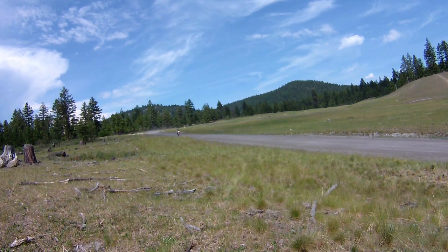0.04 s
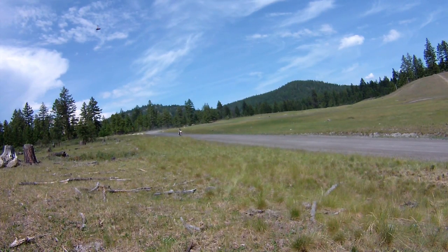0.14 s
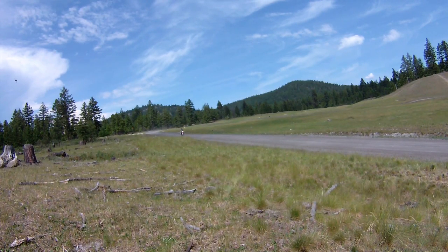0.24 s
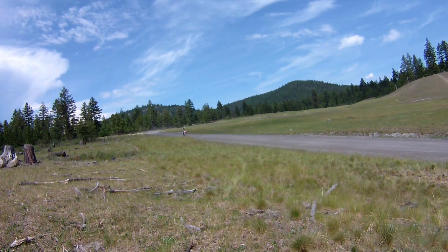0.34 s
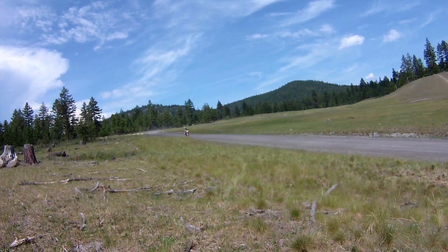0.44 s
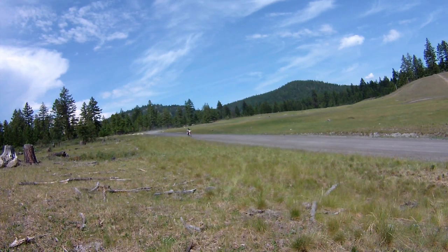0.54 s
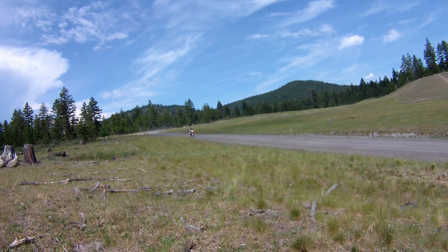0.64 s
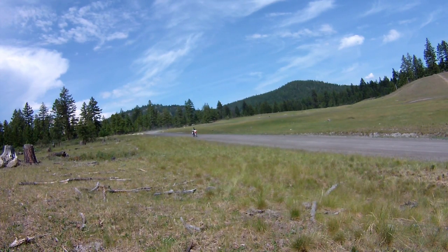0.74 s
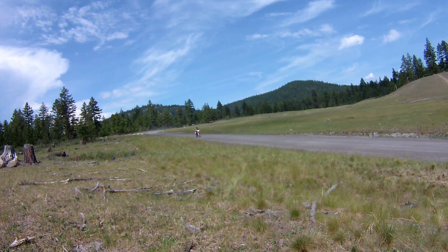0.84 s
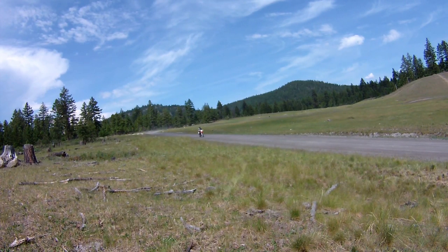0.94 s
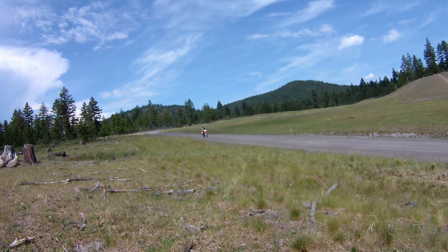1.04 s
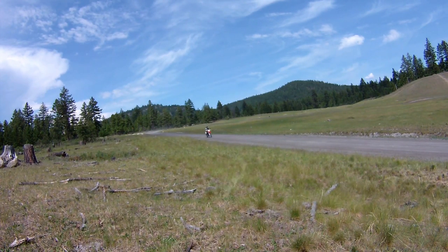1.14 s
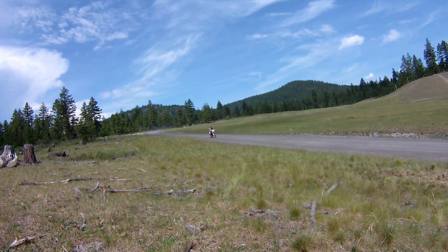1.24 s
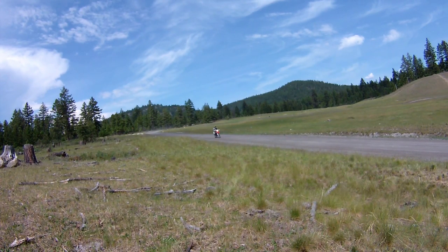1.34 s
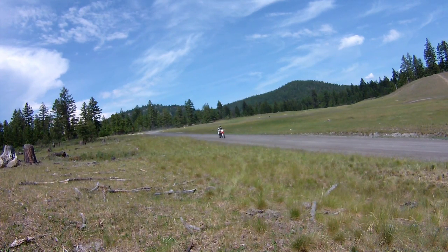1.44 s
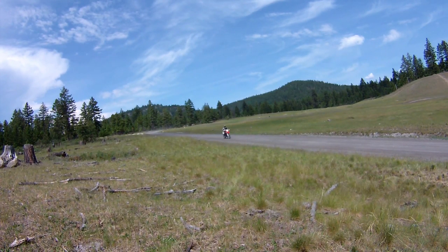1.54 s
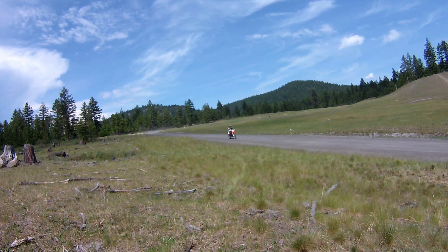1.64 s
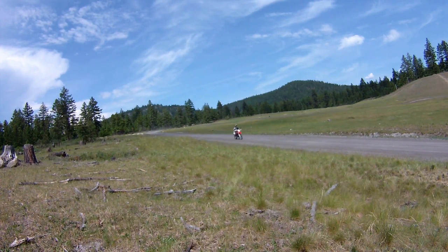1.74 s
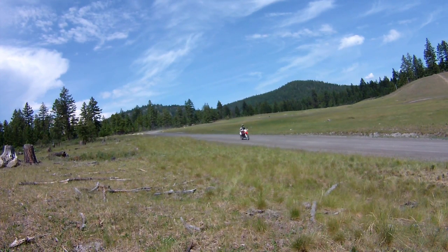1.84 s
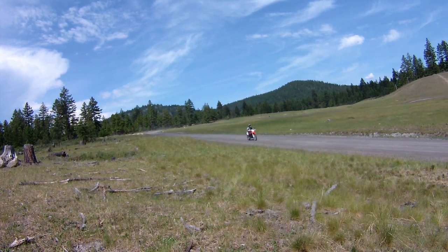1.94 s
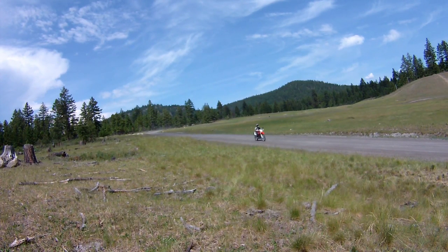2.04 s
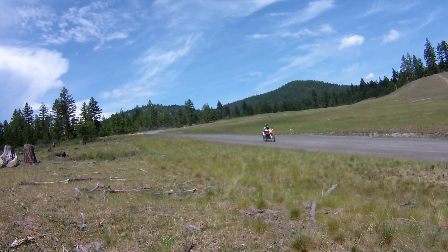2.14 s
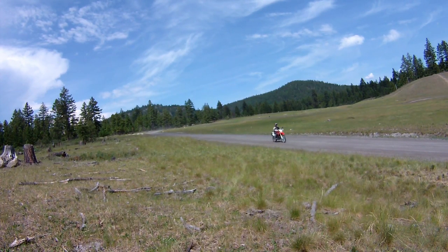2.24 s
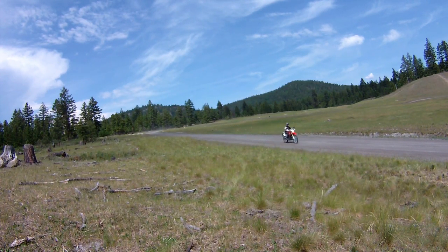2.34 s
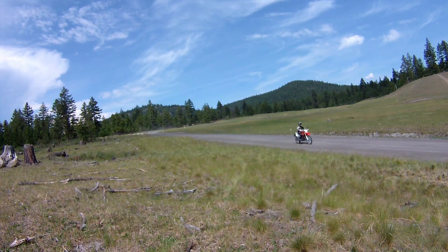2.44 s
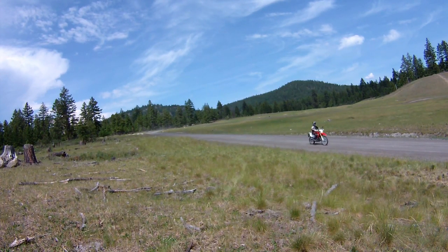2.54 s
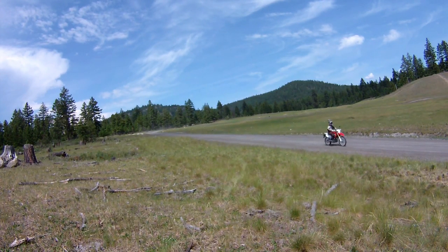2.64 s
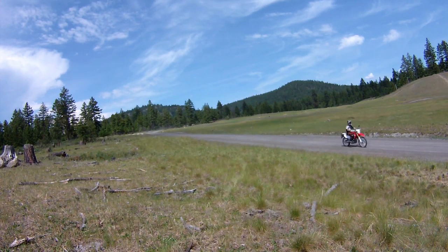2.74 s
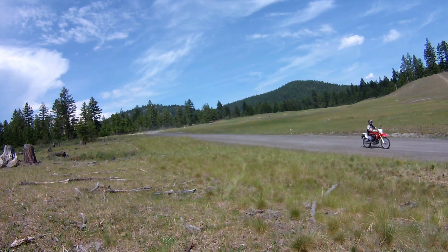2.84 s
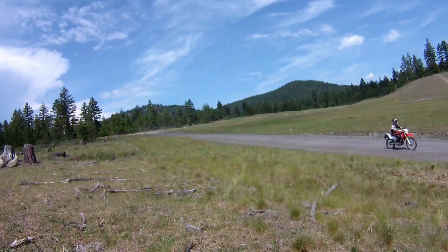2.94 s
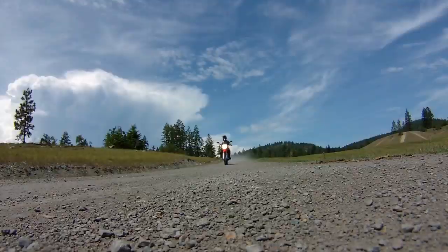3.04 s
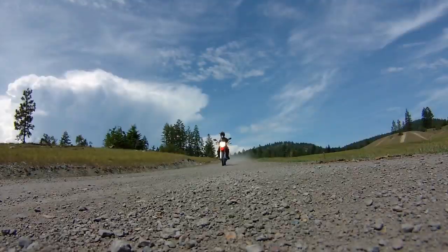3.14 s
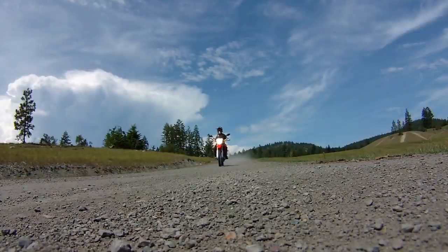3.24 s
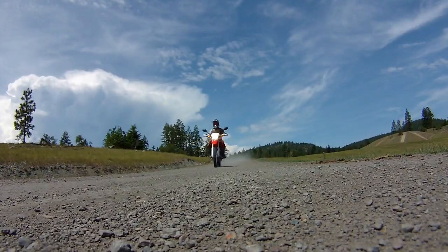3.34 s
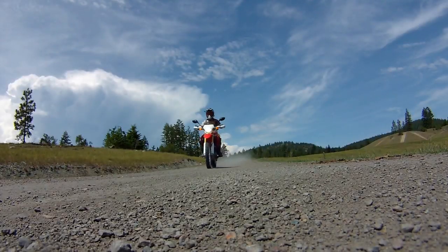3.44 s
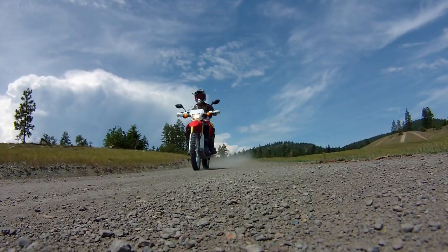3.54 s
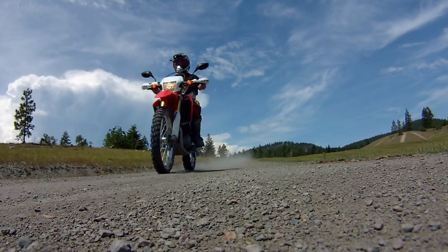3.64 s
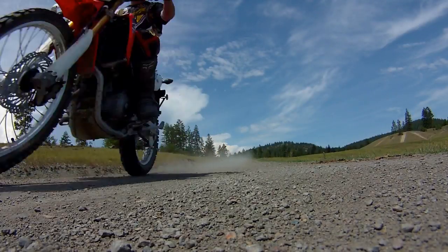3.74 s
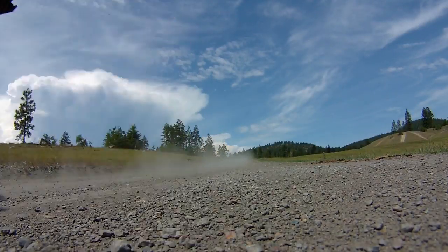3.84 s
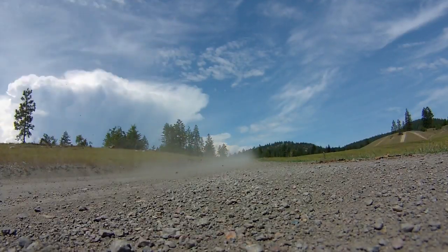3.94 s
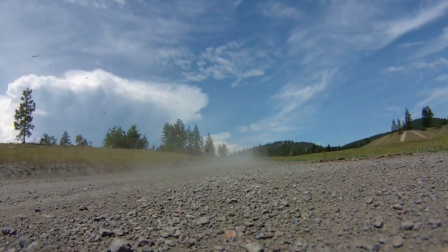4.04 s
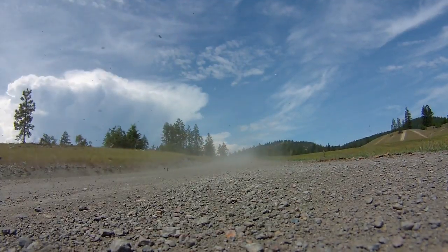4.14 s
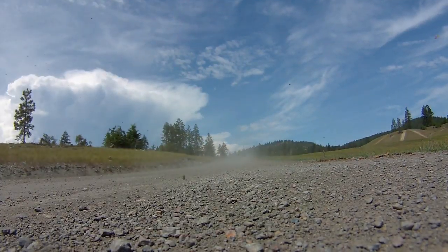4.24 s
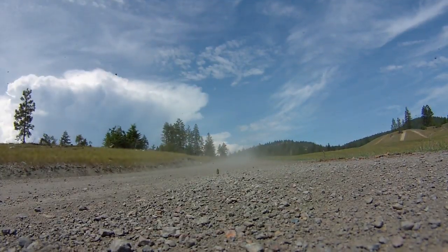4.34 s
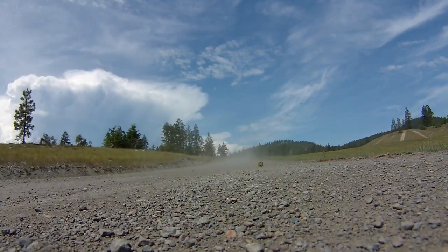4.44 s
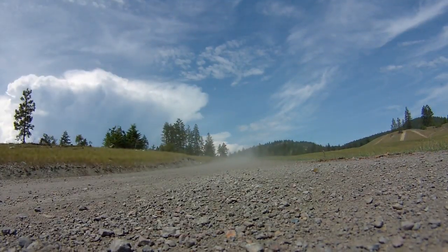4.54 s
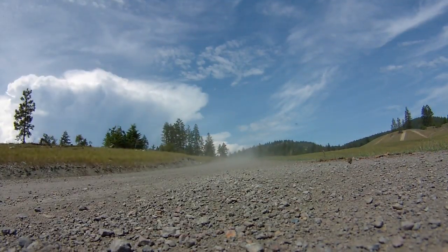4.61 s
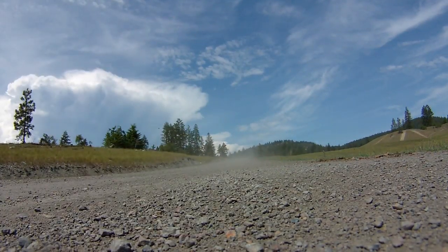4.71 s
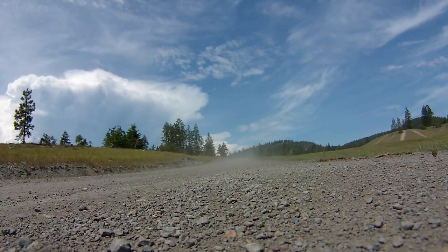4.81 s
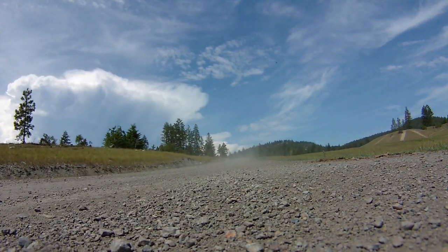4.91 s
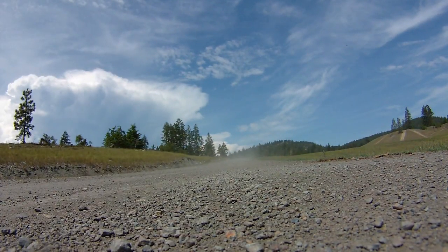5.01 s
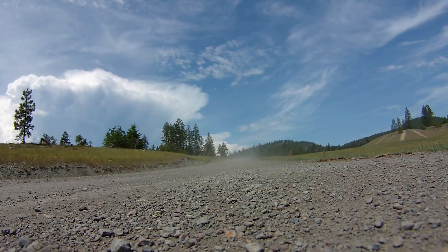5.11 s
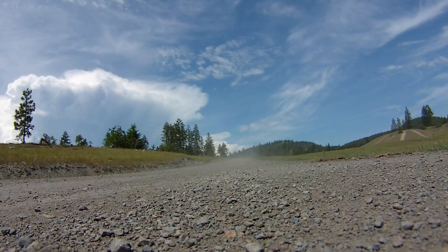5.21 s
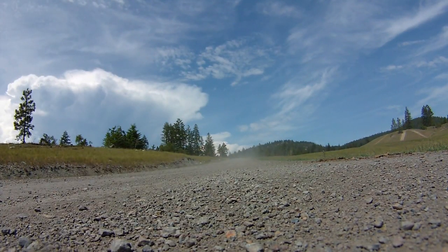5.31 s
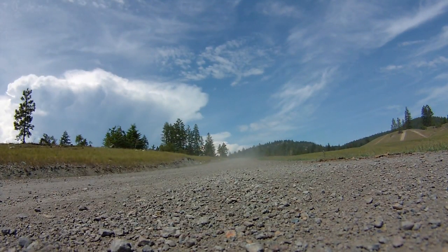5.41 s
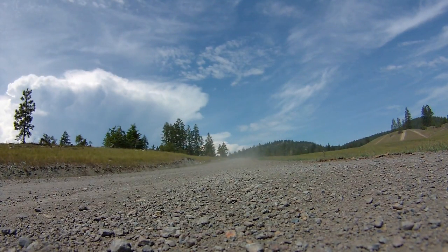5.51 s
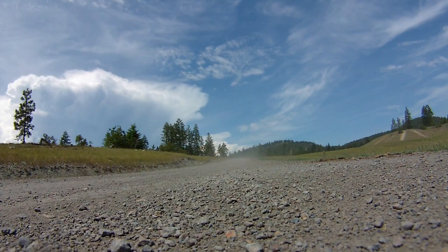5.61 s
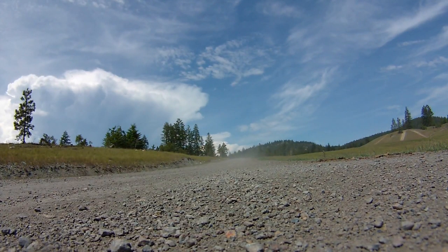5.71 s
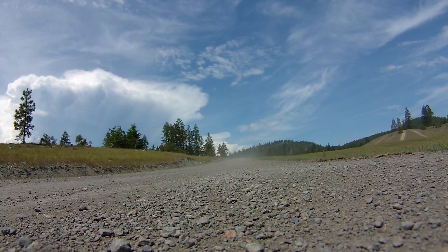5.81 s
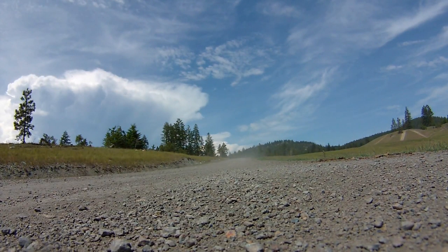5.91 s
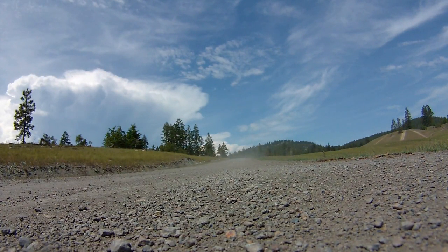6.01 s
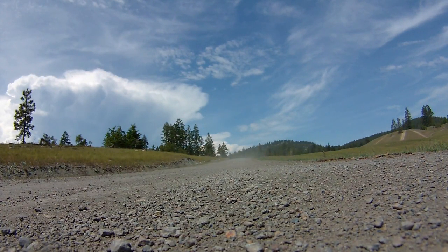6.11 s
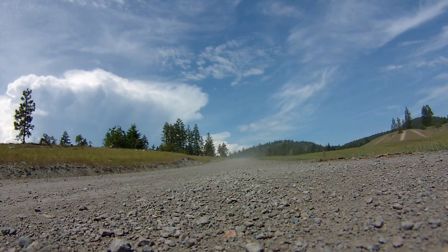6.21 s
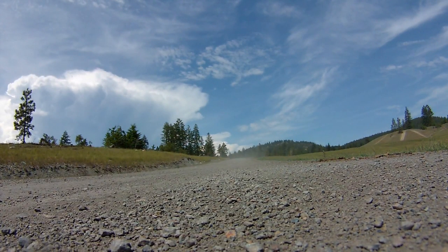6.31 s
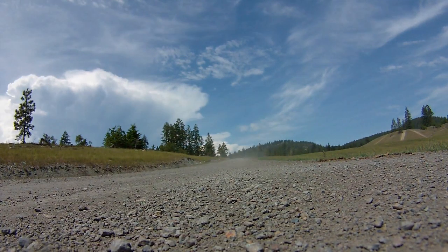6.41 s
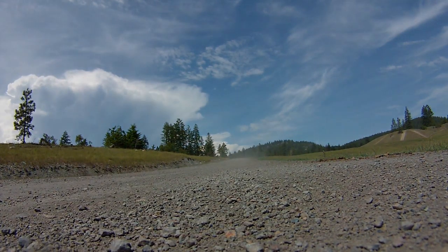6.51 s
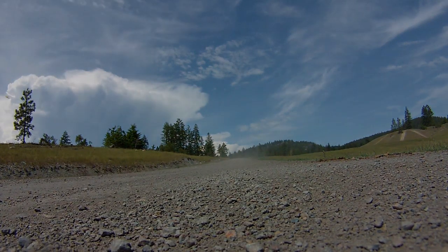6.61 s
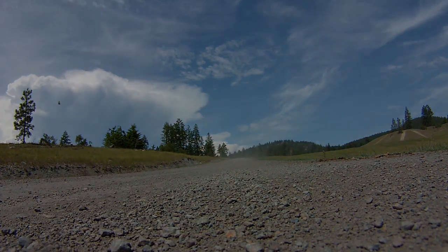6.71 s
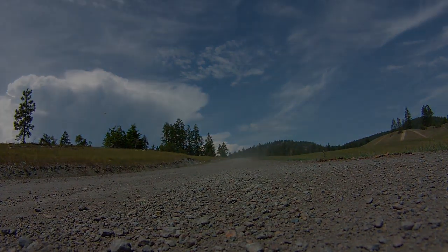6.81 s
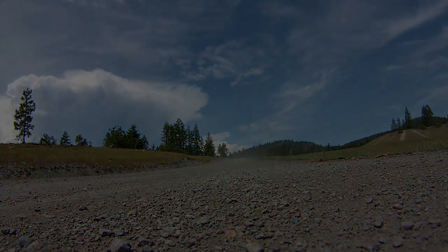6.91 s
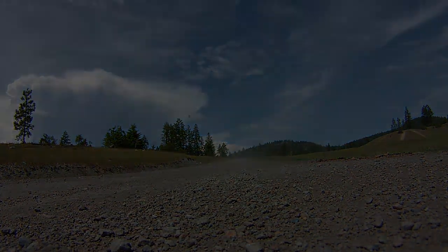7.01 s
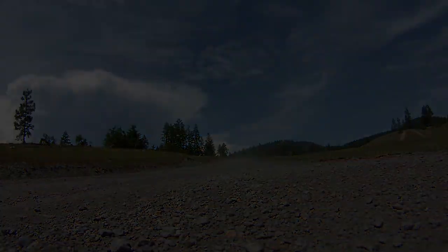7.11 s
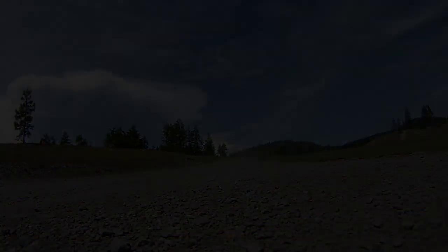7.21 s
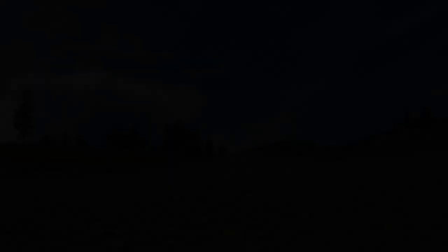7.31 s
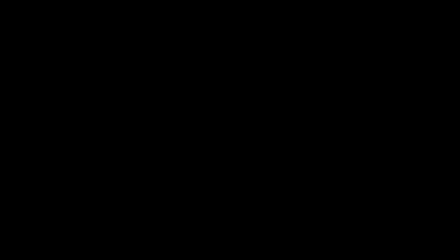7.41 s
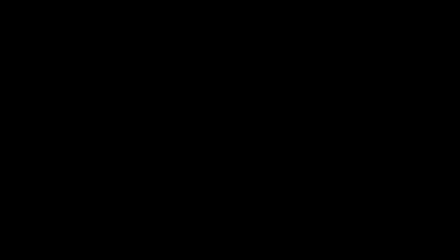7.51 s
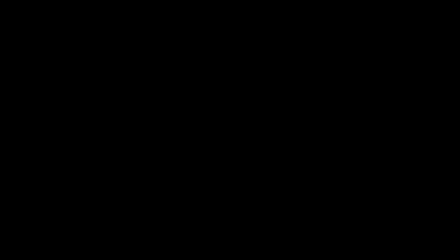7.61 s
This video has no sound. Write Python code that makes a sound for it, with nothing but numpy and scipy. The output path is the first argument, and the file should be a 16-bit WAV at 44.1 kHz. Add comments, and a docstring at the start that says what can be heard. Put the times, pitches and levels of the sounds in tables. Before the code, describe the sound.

A single-cylinder dirt bike approaches over gravel, roars past very close, drops in pitch, then blips its throttle as it rides away and fades.

```python
"""On a gravel road, a single-cylinder dirt bike comes down to a small camera on the ground, passes close by
and rides off, shutting and blipping the throttle. Exhaust orders, a ringing engine casing and tyre noise
make the bike, with two hums behind it. Its wake buffets the microphone and flung grit ticks on the housing.
The recorder holds each of its 12000 samples a second as a step, which mirrors the sound into the treble."""
import sys
import numpy as np
from scipy import signal
from scipy.fft import rfft, irfft
from scipy.io import wavfile
from scipy.ndimage import uniform_filter1d

SR = 44100
rng = np.random.default_rng(int(sys.argv[2]) if len(sys.argv) > 2 else 0)


def materialize(psi):
    """Save the field psi as 16-bit PCM at rate SR to the path in sys.argv[1].

    A 1-D psi becomes a single channel; in a 2-D psi each row is a channel.
    """
    bounded = np.clip(np.atleast_2d(psi).T, -1, 1)
    quanta = np.round(bounded * 32767).astype(np.int16)
    wavfile.write(sys.argv[1], SR, quanta)


N = 337806
T = np.arange(N) / SR  # time in seconds

# Engine winding up, then the throttle shuts, blips, shuts and opens.
# Each row: time in seconds, firing rate at the engine in Hz.
FIRING_RATE = [(0, 50.97), (.6, 52.07), (1.2, 52.88), (1.65, 53.7), (2.2, 54.17), (2.7, 54.47),
               (3.05, 55.02), (3.9, 55.62), (4.5, 55.62), (4.78, 54.5), (4.9, 52.05), (5.12, 43.4),
               (5.43, 33.5), (5.5, 33.1), (5.9, 50.1), (6.5, 28.8), (6.72, 23), (6.86, 21.2), (7.1, 24.6),
               (7.35, 31.3)]
# Roar of casing and gravel. Each row: time in seconds, level before the loss with distance in dB.
ROAR_LEVEL = [(0, -15), (1.06, -16.5), (1.3, -19), (1.91, -20), (3.05, -13), (3.7, -10), (4.12, -10.5),
              (4.15, -19), (4.34, -12.5), (4.63, -10.5), (4.67, -16.5), (4.79, -9), (5.7, -14), (5.83, -11),
              (5.97, -16), (6.59, -19.5), (7.2, -20.5), (7.38, -15)]
# Side of the bike that faces the microphone. Each row: metres past the microphone, aspect number
# (0 far ahead, 1 nearer, 2 close ahead, 3 just past, 4 riding off, 5 far behind).
ASPECT_BY_PLACE = [(-74, 0), (-35, 1), (-26, 1.15), (-13, 2), (-.1, 2), (1.5, 3), (13, 3.1), (27, 4),
                   (60, 4), (74, 5)]
# Exhaust pipe. Each row is an aspect: relative level in dB of multiples 1 to 8 of the firing rate.
PIPE_ORDERS = [
    [0, -7, -15, -8, -21, -21, -22, -22],
    [-7, 0, -11, -9, -16, -21, -19, -21],
    [0, 0, -11, -9, -14, -19, -17, -19],
    [-11, 0, -8, -12, -20, -13, -13, -2],
    [-13, -6, -1, -3, -14, -20, -22, -22],
    [-14, -11, -6, -2, -1, -2, -4, -6],
]
# Colour of the gravel noise, one list per aspect 0 to 4. Each row: frequency in Hz, relative density in dB per Hz.
GRAVEL_COLOURS = [
    [(20, -36), (60, -3), (250, -9), (550, -11.5), (800, -17.5), (1080, -18.5), (1860, -24.5), (2730, -26),
     (3600, -36), (5200, -38)],
    [(20, -14), (60, -6.5), (250, -6.5), (550, -10.5), (800, -13), (1200, -13), (1860, -22), (2730, -23),
     (3600, -31.5), (5200, -38)],
    [(20, -20.5), (60, -20), (250, -6.5), (445, -10), (1000, -13.5), (1600, -17.5), (2600, -19),
     (3300, -20), (5200, -25)],
    [(20, -5), (80, -5.5), (270, -8), (420, -5.5), (770, -16.5), (1500, -19), (2260, -20.5), (2480, -21),
     (3150, -28), (5200, -30)],
    [(20, -9), (64, -5), (140, -12), (250, -8.5), (386, -7.5), (480, -5.5), (560, -10.5), (735, -16.5),
     (2200, -20), (3500, -30.5), (5200, -35.5)],
]
# Two hums behind the bike, perhaps the tyre knobs, one list each.
# Each row: time in seconds, pitch in Hz, level before the loss with distance in dB.
HUM_TRACKS = [
    [(4.2, 483, -22), (4.32, 474, -7), (4.53, 472, -10), (4.62, 472, -13.5), (5.1, 452.5, -13),
     (5.55, 480.3, -18.5), (5.78, 485, -9.5), (6, 500, -20.5), (7.05, 483.7, -20), (7.2, 484, -34)],
    [(6.2, 429, -41), (6.5, 404, -20), (6.9, 390.4, -35), (7.2, 372, -16.5)],
]
# Swells of wind rumble. Each row: start in seconds, hold in seconds, level in dB.
WAKE_SWELLS = [(4.1, 0.0092, -23), (4.25, .2, -39.5), (4.524, 0.17, -21), (4.794, 0.096, -28)]
# Gusts that thump the microphone. Each row: start in seconds, relative level in dB, pitch in Hz, +1 push or -1 pull.
GUST_THUMPS = [(4.512, -14.5, 45.8, -1), (4.531, -28.5, 44.6, 1), (4.544, -12.5, 55, -1),
               (4.584, -2.5, 94, 1), (4.593, -5, 96.9, -1), (4.637, -1, 107, 1), (4.654, -16, 70.5, -1),
               (4.677, -7, 85, 1), (4.762, -11, 60, -1), (4.787, -5, 103, 1), (4.977, -18, 45.6, -1),
               (5.406, -22, 110, -1)]
# Grains on the housing. Each row: start in seconds, relative level in dB, pitch in Hz.
GRIT_TICKS = [(4.435, -19.5, 5340), (4.443, -23.5, 4730), (4.699, -41, 4760), (4.9796, -27.5, 5460)]
# Brief dip of the level: half width (to 1/e of the depth) in seconds, depth in dB.
DIP_SHAPE = (.008, -11)
# Filter ahead of the sampler. Each row: frequency in Hz, gain in dB.
SAMPLER_FILTER = [(5000, -1), (5400, -5.5), (5700, -12), (6000, -17.5)]
# Ring of the engine casing, one list from ahead and one from behind.
# Each row: frequency in Hz, width in Hz, relative level in dB.
CASING_MODES = [
    [(705, 160, -11), (903, 49, 0), (1065, 168, 2), (1090, 86, -14), (1545, 72, -10), (2048, 52, -8.5),
     (2268, 63, -12.5), (2420, 91, -13), (2698, 33, -7), (3125, 160, -16.5), (3830, 180, -23),
     (4180, 110, -22.5)],
    [(602, 400, -11.5), (950, 310, -4.5), (1560, 120, -3), (1808, 74, -7), (2474, 97, -6.5),
     (2614, 33, -11.5), (2940, 190, -16.5), (3480, 99, -15.5)],
]
# How far the casing stands out: one relative level in dB for each aspect 0 to 5.
CASING_BY_ASPECT = [-3.5, -3.5, -3, -1.06, -4.5, -5]
# The exhaust beat sinks and returns. Each row: deepest moment in seconds, depth in dB, fall in seconds,
# recovery in seconds.
BEAT_LULLS = [(4.17, -8.5, 0.067, 0.33), (4.7, -8, 0.24, 0.63), (5.45, -17, .05, 0.29),
              (6.86, -17.5, .38, 0.73), (7.4, -9, 0.28, .1)]

SPEED_M_S, PASS_S, MISS_M, SOUND_M_S = 27.42, 4.115, .75, 343  # MISS_M: closest distance of the path
SIZE_M = 3.4  # close up the bike is a wide source, which blunts the peak of loudness
BEAT_DB, BEAT_LOSS_DB_PER_M = -1.5, -0.0207  # exhaust before spreading, and what the air takes from it per metre
DIP_S = 3.741  # centre of the brief dip
WAKE_RISE_DB_S, WAKE_FALL_DB_S = 131.5, 84.5
HOLD_HZ, BAND_LIMIT_HZ = 12000, 15400
END_S, FADE_S, FADE_POWER = 7.42, 0.92, 1.51  # the closing fade


def bike():
    """Exhaust beat, plus casing and gravel under one roar level, all before the loss with distance."""
    hz = firing_hz()
    cycles = np.cumsum(hz) / SR + .0006 * drift(hz=25)  # one firing per cycle, slightly uneven
    roar = casing(hz, cycles) + amp(-2.5) * gravel(cycles)
    return amp(beat_db()) * exhaust(cycles) + amp(curve(ROAR_LEVEL)[0]) * roar


def exhaust(cycles):
    """Orders in step make one dip of pressure per firing; no two firings burn alike."""
    orders = amp(np.transpose(PIPE_ORDERS) @ shares(count=len(PIPE_ORDERS)))
    orders = orders / np.sqrt((orders[:4] ** 2).sum(0) / 2)  # the first four together have rms 1
    beat = np.zeros(N)
    for k, gain in enumerate(orders, 1):
        burn = amp(0.25 * drift(hz=30))
        phase = 2 * np.pi * k * cycles - .6 + 0.053 * drift(hz=30.2)
        beat -= gain * burn * np.cos(phase)
    return beat


def casing(hz, cycles):
    """A clack at every crank turn, two turns to a firing, rings the engine casing."""
    crank = 2 * cycles - .4
    at = np.flatnonzero(np.diff(np.floor(crank)) > 0)
    fired = np.floor(crank[at + 1]) % 2 == 0
    clacks = np.zeros(N)
    clacks[at] = np.sqrt(SR / hz[at]) * amp(0.25 * drift(hz=60)[at]) * np.where(fired, 1, .4)
    share = shares(count=len(PIPE_ORDERS))
    ahead = share[:3].sum(0) * ring(clacks, CASING_MODES[0])
    behind = share[3:].sum(0) * ring(clacks, CASING_MODES[1])
    load = np.clip(hz / 52, 0, 1) ** 3.4  # slower turns strike more softly
    return load * amp(np.dot(CASING_BY_ASPECT, share)) * (ahead + behind)


def gravel(cycles):
    """Noise that swells with each firing, as stones under the tyres come in clumps."""
    swell = 1.466 + 0.4 * np.exp(-((cycles - .2) % 1) / 0.73)
    clumps = amp(0.18 * drift(hz=150) + .5 * drift(hz=4))
    crunch = rng.standard_normal(N) * swell * clumps
    out = np.zeros(N)
    for share, points in zip(shares(count=len(GRAVEL_COLOURS)), GRAVEL_COLOURS):
        out += share * signal.oaconvolve(crunch, colour(points, lo_hz=535, hi_hz=4970))[:N]
    return out


def ring(x, modes):
    """Resonators that give white input the listed rms; each swells and sinks as the bike weaves."""
    out = np.zeros(N)
    for k, (hz, width, db) in enumerate(modes):
        struck = np.roll(x, int(k * .0017 * SR))  # each part is struck at its own moment of the turn
        turn = 2 * np.pi * hz / SR
        r = np.exp(-np.pi * width / SR)
        tone = signal.lfilter([1], [1, -2 * r * np.cos(turn), r * r], struck)
        level = np.sqrt(2 * (1 - r * r)) * np.sin(turn)
        out += amp(db + 1.46 * drift(hz=5.7)) * level * tone
    return out


def firing_hz():
    """Firing rate as heard: the Doppler shift follows the speed along the line to the microphone."""
    toward = along() / np.hypot(along(), MISS_M)  # -1 coming, +1 going
    return curve(FIRING_RATE)[0] / (1 + SPEED_M_S / SOUND_M_S * toward)


def beat_db():
    """Exhaust level with its loss in the air over distance and its lulls."""
    lulls = sum(db * np.interp(T, [s - fall, s, s + back], [0, 1, 0]) for s, db, fall, back in BEAT_LULLS)
    return BEAT_DB + BEAT_LOSS_DB_PER_M * abs(along()) + lulls


def hum(rows):
    """A tone, slightly unsteady in pitch and level."""
    hz, db = curve(rows)
    on = np.clip((T - rows[0][0]) / 0.017, 0, 1)
    phase = 2 * np.pi * np.cumsum(hz + 3.5 * drift(hz=28.4)) / SR
    return np.sqrt(2) * on * amp(db + 0.96 * drift(hz=18)) * np.sin(phase)


def along():
    """Metres past the microphone, at a steady speed."""
    return SPEED_M_S * (T - PASS_S)


def spread_db():
    """Loss with distance, inverse square but blunted close up by the size of the bike."""
    return -10 * np.log10(along() ** 2 + MISS_M ** 2 + SIZE_M ** 2)


def shares(count):
    """Weight of each aspect over time: one fades into the next as the bike turns past the microphone."""
    aspect = np.clip(np.interp(along(), *np.transpose(ASPECT_BY_PLACE)), 0, count - 1)
    return np.maximum(1 - abs(aspect - np.arange(count)[:, None]), 0)


def wake():
    """Lumpy wind rumble, and for each gust a swing of pressure on the microphone with a flutter on it."""
    rumble, flutter = wind(22, 95), wind(120, 480)
    out = amp(wake_db() + 2.5 * drift(hz=30)) * rumble
    for s, db, hz, sign in GUST_THUMPS:
        u = np.arange(int(2 * SR / hz)) * hz / SR  # time in cycles
        swing = np.sign(sign) * np.sin(2 * np.pi * u) * np.exp(-u ** 3 / .6)
        shake = amp(-15) * flutter[round(s * SR):][:len(u)] * np.sin(np.pi * u / 2)
        add(out, s, amp(db - 2.0) * (swing + shake))
    return out


def wind(lo_hz, hi_hz):
    """Turbulence as band-passed noise of rms 1."""
    band = signal.butter(2, [lo_hz, hi_hz], "band", fs=SR, output="sos")
    x = signal.sosfilt(band, rng.standard_normal(N))
    return x / x.std()


def wake_db():
    """The strongest swell at each moment: quick rise, hold, slower fall."""
    swells = []
    for s, hold, db in WAKE_SWELLS:
        rise = WAKE_RISE_DB_S * np.maximum(s - T, 0)
        fall = WAKE_FALL_DB_S * np.maximum(T - s - hold, 0)
        swells.append(db - rise - fall)
    return np.max(swells, axis=0)


def grit():
    """Each grain rings the housing for a few cycles."""
    out, t = np.zeros(N), np.arange(200) / SR
    envelope = (t / 0.00017) * np.exp(1 - t / 0.00042)
    for s, db, hz in GRIT_TICKS:
        add(out, s, amp(db - 5.5) * np.sin(2 * np.pi * hz * t) * envelope)
    return out


def amp(db):
    """Decibels to amplitude."""
    return 10 ** (np.asarray(db) / 20)


def curve(rows):
    """Columns of a table after the time, joined by straight lines at every sample."""
    s, *columns = np.transpose(rows)
    return [np.interp(T, s, c) for c in columns]


def add(mix, s, sound):
    """Lay a sound into the mix from s seconds on."""
    part = mix[round(s * SR):][:len(sound)]
    part += sound[:len(part)]


def drift(hz):
    """Slow chance of rms 1: noise smoothed twice over 1/hz seconds."""
    size = int(SR / hz)
    x = uniform_filter1d(uniform_filter1d(rng.standard_normal(N), size), size)
    return x / x.std()


def colour(points, lo_hz, hi_hz):
    """Causal minimum-phase filter with the given spectrum, scaled by its power within the band."""
    hz = abs(np.fft.fftfreq(16384, 1 / SR))
    f, db = np.transpose(points)
    db = np.interp(np.log(hz + 1), np.log(f + 1), db, right=db[-1])
    log = np.log(amp(np.maximum(db, -90)))
    taps = np.fft.ifft(np.exp(log - 1j * signal.hilbert(log).imag)).real[:8192]
    in_band = (hz > lo_hz) * (hz < hi_hz)
    return taps / np.sqrt(np.mean(np.exp(2 * log) * in_band))


def scene():
    """The bike and its hums at their distance, with wake and grit right at the microphone."""
    half_width, depth_db = DIP_SHAPE
    dip = amp(depth_db * np.exp(-((T - DIP_S) / half_width) ** 2))
    rider = bike() * dip + sum(map(hum, HUM_TRACKS))
    return (amp(spread_db()) * rider + wake() + grit())[None]


def record(dry):
    """Sampling mirrors the band about the sample rate, the steps weight it by a sinc; then the band limit."""
    hz = np.fft.rfftfreq(N, 1 / SR)
    step = np.sinc(hz / HOLD_HZ)
    low = hz < HOLD_HZ / 2
    faded = dry * np.clip((END_S - T) / FADE_S, 0, 1) ** FADE_POWER
    # dividing by the step ahead of the sampler keeps the steps from dulling the low band
    gain = low * amp(np.interp(hz, *np.transpose(SAMPLER_FILTER))) / np.where(low, step, 1)
    band = irfft(rfft(faded) * gain, N)
    sampled = band * (1 + 2 * np.cos(2 * np.pi * HOLD_HZ * T))
    held = irfft(rfft(sampled) * step * amp(-1.1 * hz / HOLD_HZ), N)  # with a slight treble loss
    limit = signal.firwin(1023, BAND_LIMIT_HZ, window=("kaiser", 11), fs=SR)
    return signal.oaconvolve(held, limit[None], "same")


dry = scene()
out = record(dry)
materialize(out)
```